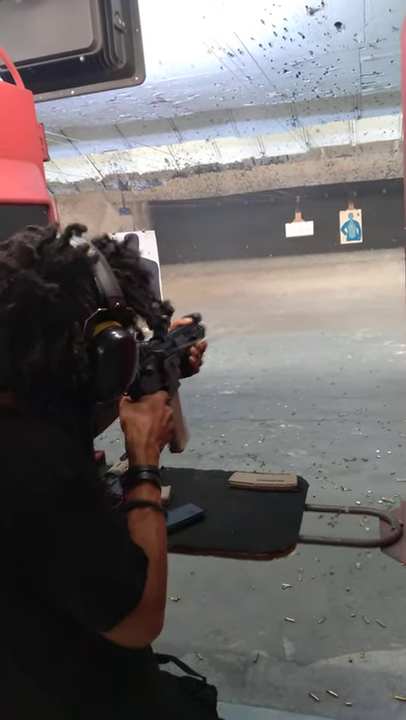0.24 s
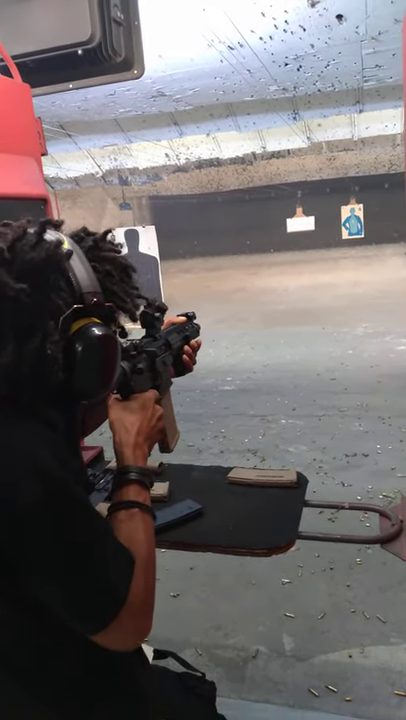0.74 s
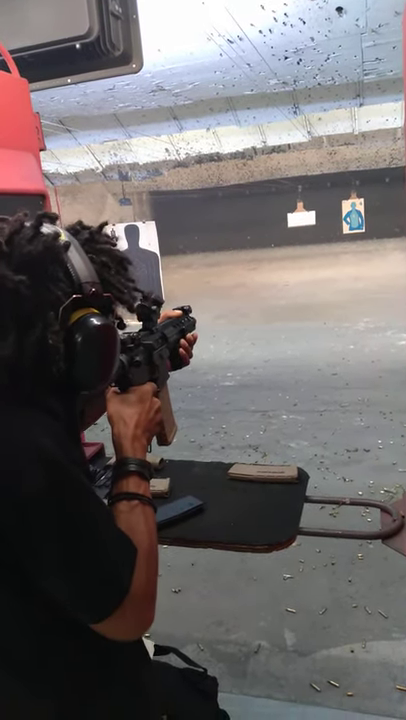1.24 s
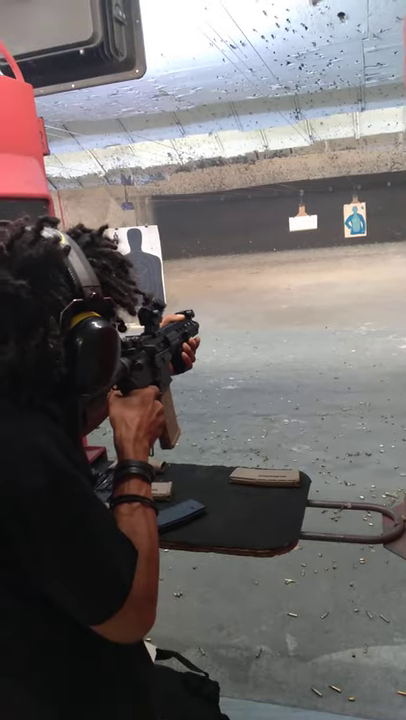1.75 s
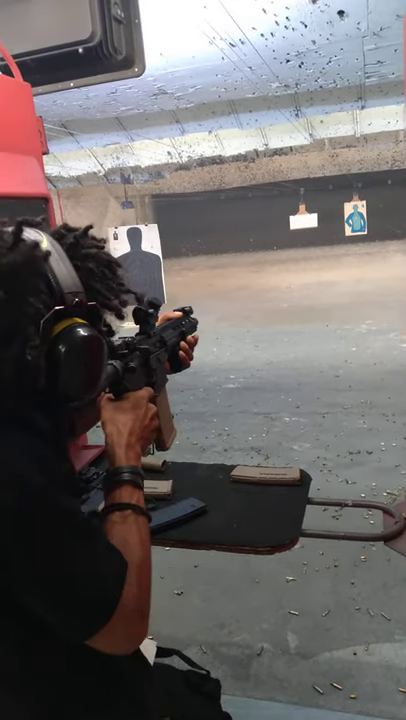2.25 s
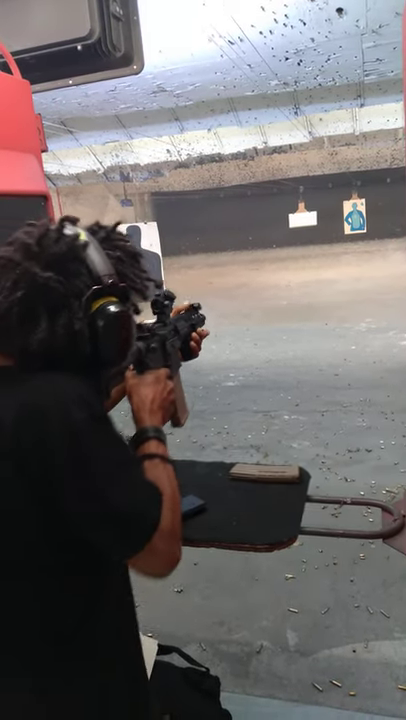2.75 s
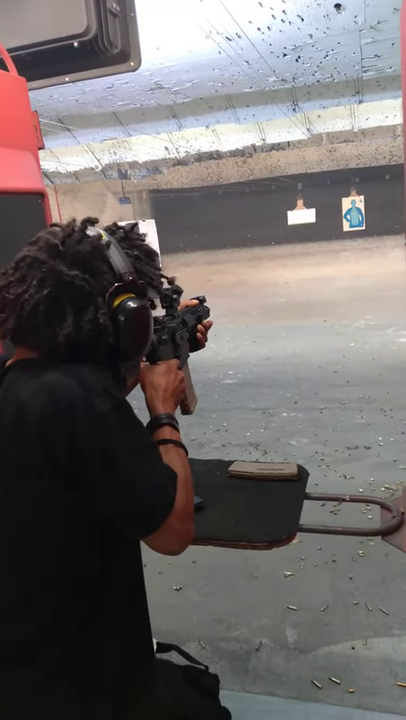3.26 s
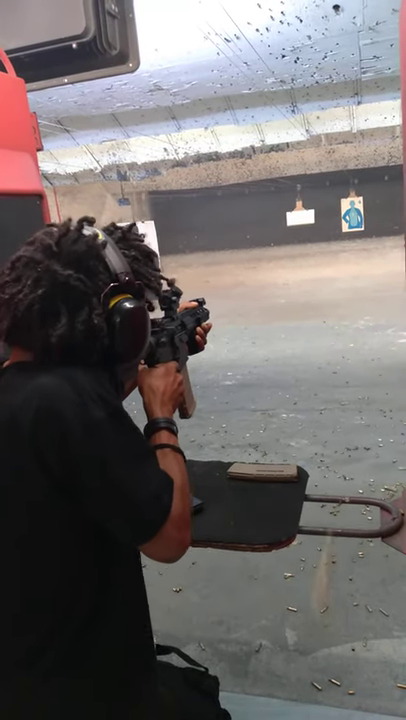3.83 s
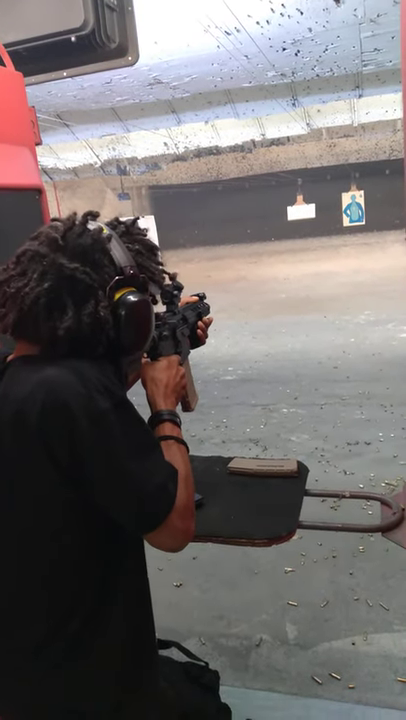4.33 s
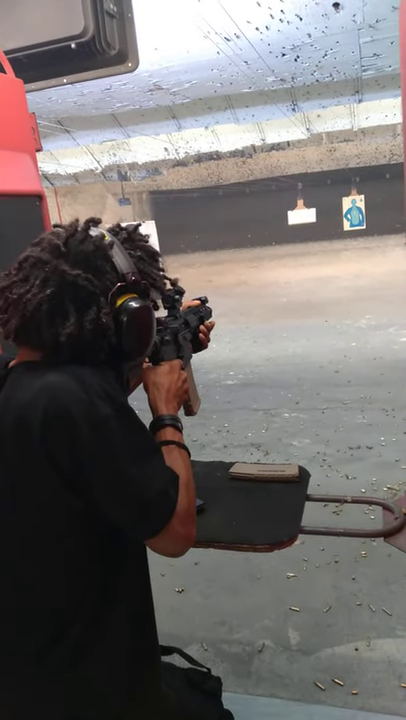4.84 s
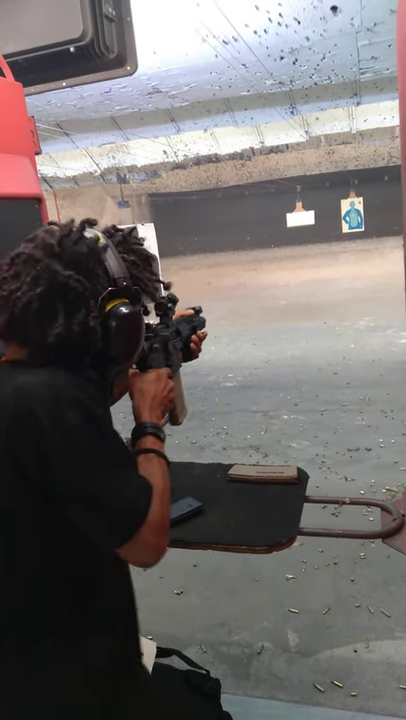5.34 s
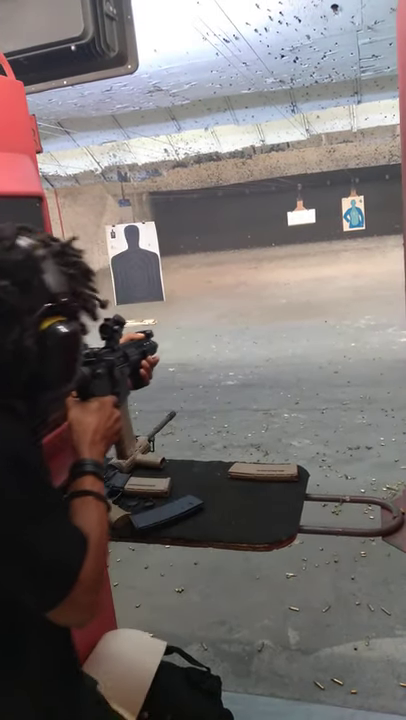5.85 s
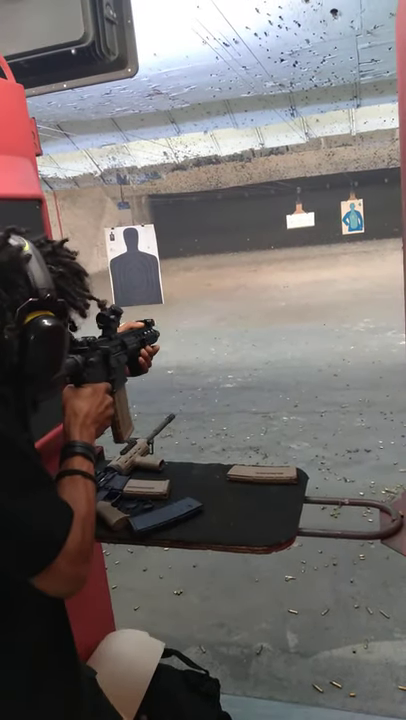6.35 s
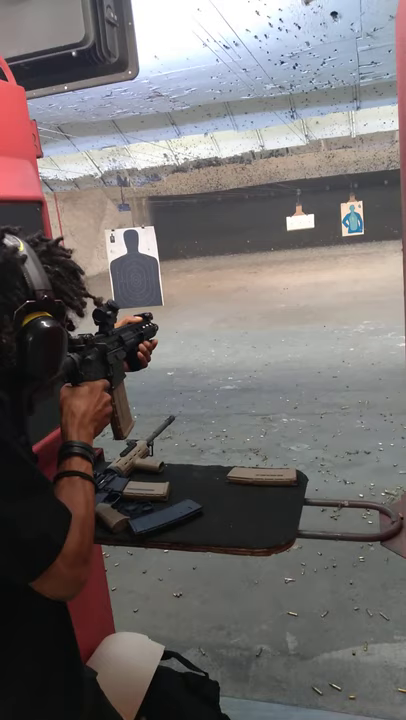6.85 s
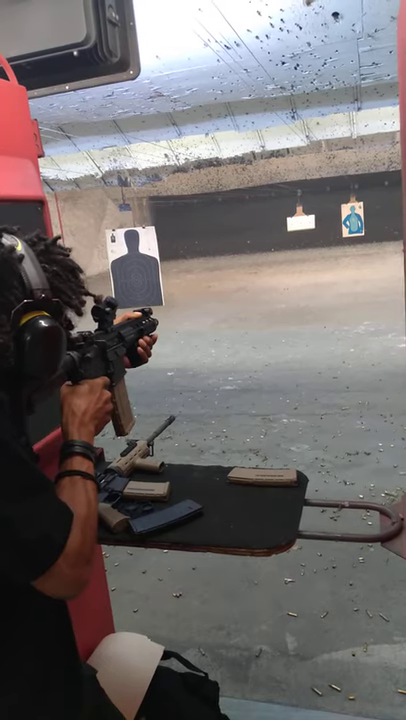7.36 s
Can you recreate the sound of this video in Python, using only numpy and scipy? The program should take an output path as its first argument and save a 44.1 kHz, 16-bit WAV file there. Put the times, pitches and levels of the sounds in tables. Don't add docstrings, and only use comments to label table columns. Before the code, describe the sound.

Deafening rifle shots crack one after another in a hard-walled indoor range, a second gun answering nearby, roars overlapping, brass cases tinkling on concrete.

```python
import sys
import numpy as np
from scipy import signal
from scipy.io import wavfile
from scipy.ndimage import uniform_filter1d

SR = 44100
rng = np.random.default_rng(int(sys.argv[2]) if len(sys.argv) > 2 else 0)


def dump(signal):
    limited = np.clip(np.atleast_2d(signal).T, -1, 1)
    pcm = np.round(limited * 32767).astype(np.int16)
    wavfile.write(sys.argv[1], SR, pcm)


def level_to_linear(level):
    exponent = np.asarray(level, float) / 20
    return 10 ** exponent


N = 334719

# start in seconds, blast in dB over full scale, extra bass in dB,
# extra treble in dB, decay stretch as a factor.
RIFLE_SHOTS = [
    (-.45, 54, -1, -15, 0.89),
    (0.278, 46, -10.5, 1, 0.97),
    (2.0431, 50, -2.5, -3, 1.037),
    (3.5104, 58, -2.5, -1.5, 0.87),
    (5.0049, 51.5, -7, -1, 0.875),
]
LIGHT_SHOTS = [
    (1.6503, 59, -4, 1.5, 0.57),
    (4.2608, 45.5, -4.5, -4.5, 1),
    (6.2772, 38.5, -5.5, 1.5, .96),
]
# start in seconds, level in dB.
FIZZ = [
    (0.2672, -14),
    (2.037, -11),
    (3.502, -18),
    (4.997, -14.5),
]
# frequency in Hz, density in dB per Hz.
RIFLE_SPECTRUM = [(40, -11.5), (65, 0), (110, -7), (200, -7), (400, -3), (800, -0.5), (1400, -4),
                  (1800, -5.5), (3000, -6), (5000, -9), (7000, -4.5), (9500, 2), (12000, -4), (16000, -5)]
# frequency in Hz, density in dB per Hz.
LIGHT_SPECTRUM = [(40, -33), (90, -30), (200, -27.5), (350, -8.5), (800, 4.5), (1450, -2.5), (1750, -7.5),
                  (2500, -4), (4500, -10.5), (7000, -3), (9500, 2.5), (12000, -6.5), (16000, -3)]
# extra middle in dB, share of the extra bass that the middle follows,
# left minus right in dB.
RIFLE_PLACE = (3.9, 1.09, 3)
LIGHT_PLACE = (3.5, 0.18, 1.5)
# frequency in Hz, t60 in seconds.
HALL_T60_S = [(60, 1.056), (250, 1.082), (600, .95), (1200, 0.89), (2500, 0.77), (5000, 0.68), (7000, 0.66),
              (10000, 0.52), (15000, .395)]
# frequency in Hz, level in dB re the first tail.
FAR_TAIL_DB = [(60, -54), (200, -52.5), (600, -47.5), (1500, -31.5), (4000, -46.5), (15000, -76)]
# frequency in Hz, correlation.
LIKENESS = [(60, 0.98), (180, 1), (300, 0.9), (600, 0.43), (1400, -0.0091), (5000, -.05)]
# frequency in Hz, left minus right in dB.
BALANCE_DB = [(60, -9), (180, -1.5), (550, -3), (1650, 1), (4970, 1.5), (15000, 2)]
# frequency in Hz, width in Hz, lift in dB.
LANE_MODES = [(225, 59, 4), (336, 49, 4.5), (410.2, 37, 6.5), (573, 82, 2), (834, 100, 2.5)]
# start in seconds, tick in dB, lower ring in dB, upper ring in dB,
# left minus right in dB.
BOUNCES = [(0.0846, -13.5, -32, -28.5, -8.5), (0.9747, -10, -24.5, -16.5, -5), (1.276, -54, -52.5, -41, 5),
           (1.4426, -60, -65, -43, 13), (1.4638, -52, -64, -44, 20), (1.5514, -60, -72, -69, 9),
           (2.8195, -25.5, -48.5, -44, 16), (3.188, -31, -38, -27, 4), (3.2035, -28, -42, -37, -7.5),
           (3.373, -43, -42, -49, -5), (3.4416, -62, -70, -56, 3), (4.221, -5.5, -20, -16, -4.5),
           (4.7894, -34.5, -49.5, -33, -0.5), (4.849, -36.5, -32, -40.5, 2), (5.7304, -23, -35.5, -32.5, 9),
           (5.7373, -18.5, -63, -29, 9), (5.939, -59, -58, -70, -3.5), (6.057, -55, -70, -49, 4),
           (6.0646, -53, -71, -46, 5), (6.219, -62, -61, -46, 3)]
# frequency in Hz, level in dB, t60 in seconds.
LOWER_RING = [(11340, -4, .22), (11420, 0.5, .34)]
# frequency in Hz, level in dB, t60 in seconds.
UPPER_RING = [(15000, -5, .2), (15150, -1, .22), (15410, -1, .25), (15640, -6, .18)]
# frequency in Hz, level in dB, t60 in seconds.
TICK_MODES = [(5500, -10, 0.0041), (6630, -16, 0.0079), (8640, 4, 0.0048), (9500, 10, 0.0056),
              (12960, -10.5, .005)]
# frequency in Hz, density in dB per Hz.
VENT_SPECTRUM = [(18, -48), (30, -21.5), (118, 1), (170, -7), (473, -6), (526, -4), (1280, -2.5),
                 (1720, -26.5), (8520, -35.5), (16000, -46.5)]
# start in seconds, level in dB, frequency in Hz, t60 in seconds.
HANDLING_BUMP = (7.265, -46, 57, 0.5)

ENVELOPE_STEP = 8
DUCK_DB, CLIP_LEVEL = 6, 0.48


def at_hz(points, hz):
    table_hz, values = np.transpose(points)
    return np.interp(np.log(hz), np.log(table_hz), values)


def sides(left_minus_right_db):
    return level_to_linear(np.array([[0.5], [-0.5]]) * left_minus_right_db)


def drift(rate_hz, count):
    settle = 3000
    r = np.exp(-2 * np.pi * ENVELOPE_STEP * rate_hz / SR)
    slow = signal.lfilter([1], [1, -2 * r, r * r], rng.standard_normal(count + settle))[settle:]
    return slow / slow.std()


def ring(clicks, hz, t60_s):
    r = level_to_linear(-60 / (t60_s * SR))
    w = 2 * np.pi * hz / SR
    return signal.lfilter([0, np.sin(w)], [1, -2 * r * np.cos(w), r * r], clicks + 1e-18)


def filtered(order, hz, kind, x):
    return signal.sosfilt(signal.butter(order, hz, kind, fs=SR, output="sos"), x)


def ventilation_power(centres_hz, widths_hz):
    level_db, pan_db = -44.5, 3
    spectrum_db = at_hz(VENT_SPECTRUM, centres_hz)
    total = np.sum(level_to_linear(spectrum_db) ** 2 * widths_hz)
    level = level_to_linear(level_db - DUCK_DB + spectrum_db) * sides(pan_db)
    return level ** 2 / total * (1 + (120 / centres_hz) ** 4)


def handling():
    s, level_db, hz, t60_s = HANDLING_BUMP
    click = np.zeros(N)
    click[int(s * SR)] = level_to_linear(level_db + 12)
    return filtered(2, 90, "low", ring(click, hz, t60_s))


def case_modes(at, strength_db, pan_db, modes):
    out, clicks = np.zeros((2, N)), np.zeros((2, N))
    clicks[:, at] = level_to_linear(strength_db) * sides(pan_db)
    chatter = signal.lfilter([0.3], [1, -level_to_linear(-60 / (0.014 * SR))], clicks)
    strikes = chatter * rng.standard_normal((2, N))
    for hz, level_db, t60_s in modes:
        spin = np.repeat(drift(70, N // ENVELOPE_STEP + 1), ENVELOPE_STEP)[:N]
        out += level_to_linear(level_db) * (1 + 1.7 * spin) * ring(strikes, hz, t60_s)
    return out


def wall_wash(at, wash_db):
    clicks = np.zeros(N)
    clicks[at] = level_to_linear(wash_db)
    wash = signal.lfilter([1], [1, -level_to_linear(-60 / (0.25 * SR))], clicks)
    return filtered(4, [5000, 12500], "band", 1.7 * wash * rng.standard_normal((2, N)))


def cases():
    s, tick_db, lower_db, upper_db, pan_db = np.transpose(BOUNCES)
    at = (s * SR).astype(int)
    tick_share = 0.67
    wash_db = -4.5 + tick_share * tick_db + (1 - tick_share) * lower_db
    out = case_modes(at, tick_db - 8.5, pan_db, TICK_MODES)
    out += case_modes(at, lower_db - 7, pan_db, LOWER_RING)
    out += case_modes(at, upper_db - 13, pan_db, UPPER_RING)
    return out + wall_wash(at, wash_db)


def action_fizz():
    t, gate = np.arange(N) / SR, np.zeros(N)
    for s, level_db in FIZZ:
        gate += level_to_linear(level_db - 400 * np.abs(t - s)) * (t > s) * (t < s + 0.02)
    return filtered(2, [5500, 12000], "band", 3.6 * gate * rng.standard_normal((2, N)))


def lane_modes(x):
    out = x
    for hz, width_hz, lift_db in LANE_MODES:
        r = np.exp(-np.pi * width_hz / SR)
        poles = [1, -2 * r * np.cos(2 * np.pi * hz / SR), r * r]
        peak = signal.lfilter(np.array([1, 0, -1]) * (1 - r * r) / 2, poles, x)
        out = out + (level_to_linear(lift_db) - 1) * peak
    return out


def roar_power(shots, place, spectrum, hz, t):
    heard_s, far_t60_s, far_pan_db = 2.2, 1.394, 1.5
    return_s, return_spread_s, return_db = 0.7, 0.11, 9
    far_evens = 0.37
    power = np.zeros((2, len(t)))
    middle_db, middle_follows, pan_db = place
    bass_share = 1 / (1 + (hz / 330) ** 4)
    middle_share = np.exp(-(np.log2(hz / 1300) / 0.69) ** 2)
    treble_share = 1 / (1 + (3000 / hz) ** 2)
    bend = 0.95 + 0.19 * hz / (hz + 6000)
    rise_s = 0.0011 + (45 / hz) ** 1.2 / 4
    for s, blast_db, bass_db, treble_db, stretch in shots:
        heard = slice(*np.searchsorted(t, [s, s + heard_s]))
        age = t[heard] - s
        swell = 1 - np.exp(-age / rise_s)
        decay_db = -60 * (age / (stretch * at_hz(HALL_T60_S, hz))) ** bend
        backstop = np.exp(-((age - stretch * return_s) / return_spread_s) ** 2)
        first = level_to_linear(decay_db + treble_share * return_db * backstop) * sides(pan_db)
        far_db = at_hz(FAR_TAIL_DB, hz) - far_evens * middle_share * middle_follows * bass_db
        second = level_to_linear(far_db - 60 * age / far_t60_s) * sides(far_pan_db)
        colour_db = bass_share * bass_db + treble_share * treble_db
        colour_db += middle_share * (middle_db + middle_follows * bass_db)
        level = level_to_linear(blast_db + at_hz(spectrum, hz) + colour_db - 44.5)
        power[:, heard] += level ** 2 * swell ** 3 * (first ** 2 + second ** 2)
    return power


def hall():
    t = np.arange(0, N, ENVELOPE_STEP) / SR
    edges_hz = 35 * 2 ** (np.arange(37) / 4)
    centres_hz = np.sqrt(edges_hz[1:] * edges_hz[:-1])
    vent = ventilation_power(centres_hz, np.diff(edges_hz))
    white = rng.standard_normal((2, 2, N))
    together_db = 0.8 * drift(15, len(t))
    out = np.zeros((2, N))
    for k, hz in enumerate(centres_hz):
        mid, side = filtered(3, edges_hz[k:k + 2], "band", white[k % 2]) * np.sqrt(SR / 4)
        alike = np.clip(at_hz(LIKENESS, hz), -1, 1)
        noise = np.sqrt(1 + alike) * mid + np.sqrt(1 - alike) * side * [[1], [-1]]
        power = roar_power(RIFLE_SHOTS, RIFLE_PLACE, RIFLE_SPECTRUM, hz, t)
        power += roar_power(LIGHT_SHOTS, LIGHT_PLACE, LIGHT_SPECTRUM, hz, t)
        power += vent[:, k:k + 1]
        flutter = level_to_linear(together_db + (1.7 + 200 / (hz + 100)) * drift(12, len(t)))
        envelope = np.sqrt(power) * flutter * sides(at_hz(BALANCE_DB, hz))
        out += np.repeat(envelope, ENVELOPE_STEP, axis=1)[:, :N] * noise
    return out


def blast_fronts():
    out, length = np.zeros(N), int(0.0025 * SR)
    pulse = np.linspace(1, -1, length)
    for s, blast_db, *_ in RIFLE_SHOTS[1:] + LIGHT_SHOTS:
        for delay_s, path_db in ((0, -24), (0.0023, -21), (0.0041, -21)):
            at = int((s + delay_s) * SR)
            out[at:at + length] += level_to_linear(blast_db + path_db) * pulse
    return out


def scene():
    return lane_modes(hall()) + blast_fronts() + action_fizz() + cases() + handling()


def overload(x):
    knee = 3.7
    return x / (1 + np.abs(x / CLIP_LEVEL) ** knee) ** (1 / knee)


def gain_control(x):
    recover_s = 0.36
    t = np.arange(N) / SR
    loud = np.max(np.abs(x), axis=0) > 0.6 * CLIP_LEVEL
    since_s = t - np.maximum.accumulate(np.where(loud, t, -1))
    return x * level_to_linear(DUCK_DB * (1 - np.exp(-(since_s / recover_s) ** 2)))


def wind_filter(x):
    low = signal.sosfiltfilt(signal.butter(2, 280, fs=SR, output="sos"), x)
    products = np.array([low[0] * low[1], low[0] ** 2, low[1] ** 2])
    cross, left, right = uniform_filter1d(products, size=4096)
    alike = np.clip(1.48 * cross / np.sqrt(left * right + 1e-20), 0.5, 1)
    return x - (1 - alike) * low


def top_mute(x):
    band = signal.butter(4, [11750, 14800], "band", fs=SR, output="sos")
    top = signal.sosfiltfilt(band, x)
    limit = level_to_linear(-37) ** 2 * uniform_filter1d(x ** 2, size=1024)
    masked = uniform_filter1d(top ** 2, size=1024) < limit
    return x - 0.67 * top * uniform_filter1d(masked.astype(float), size=256)


def band_limit(x):
    return signal.sosfilt(signal.butter(12, 16460, fs=SR, output="sos"), x)


def record(dry):
    x = wind_filter(gain_control(overload(dry)))
    x = filtered(2, 105, "high", x)
    x = filtered(1, 15000, "low", x)
    x = signal.sosfilt(signal.ellip(10, 0.5, 50, 15750, fs=SR, output="sos"), x)
    return band_limit(top_mute(x))


dry = scene()
out = record(dry)
dump(out)
```